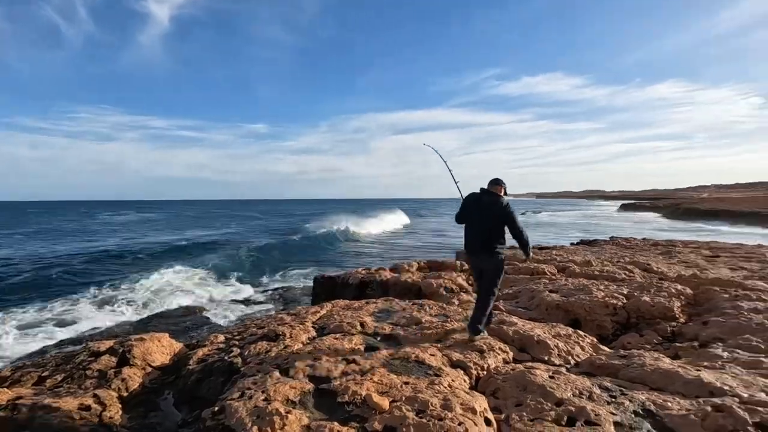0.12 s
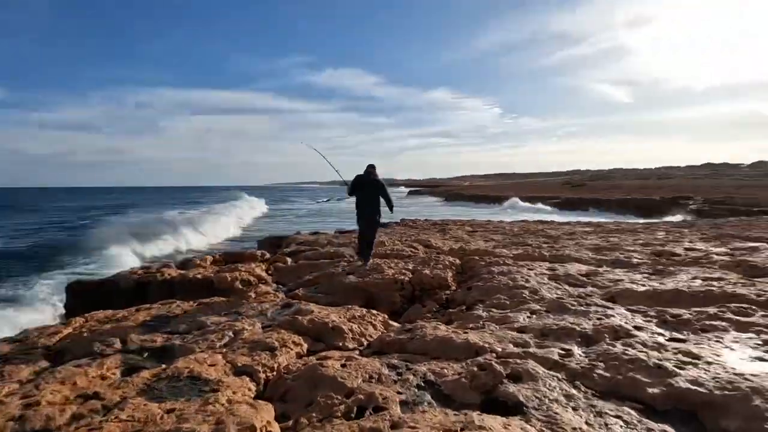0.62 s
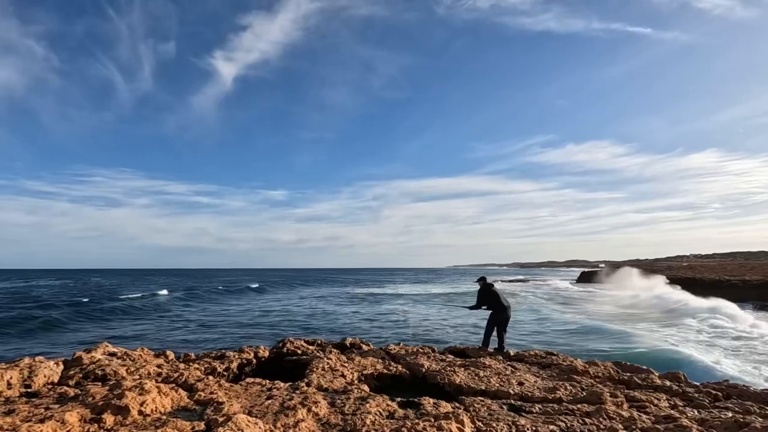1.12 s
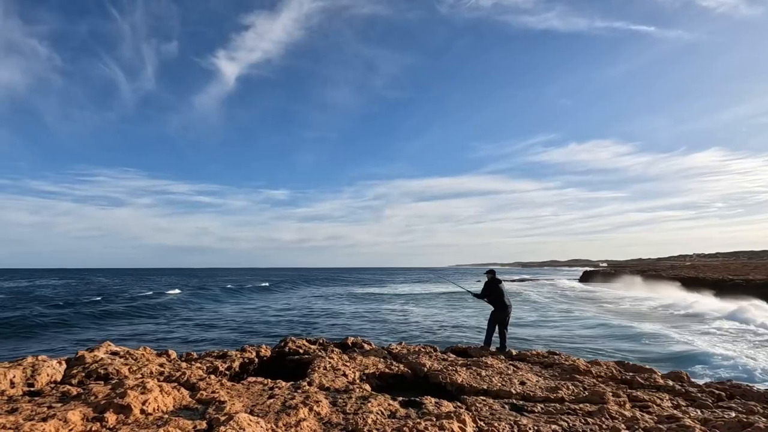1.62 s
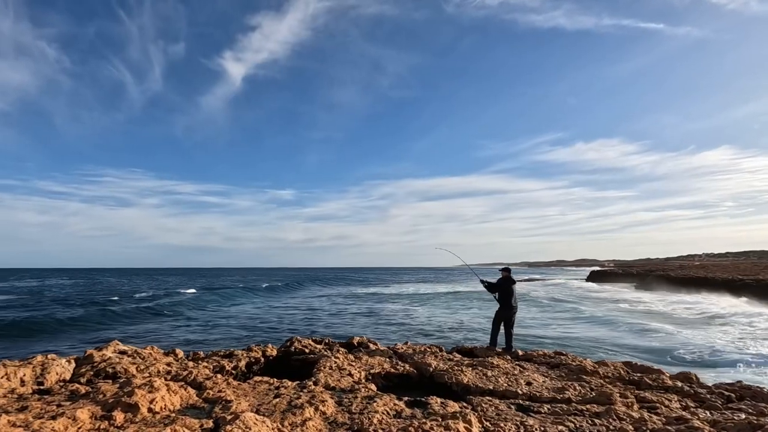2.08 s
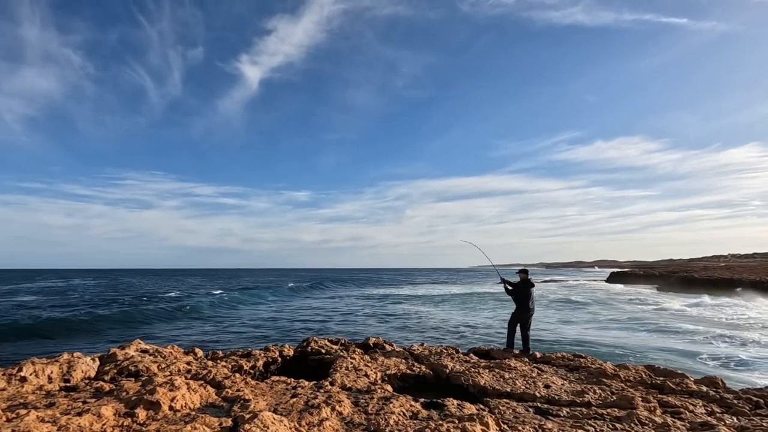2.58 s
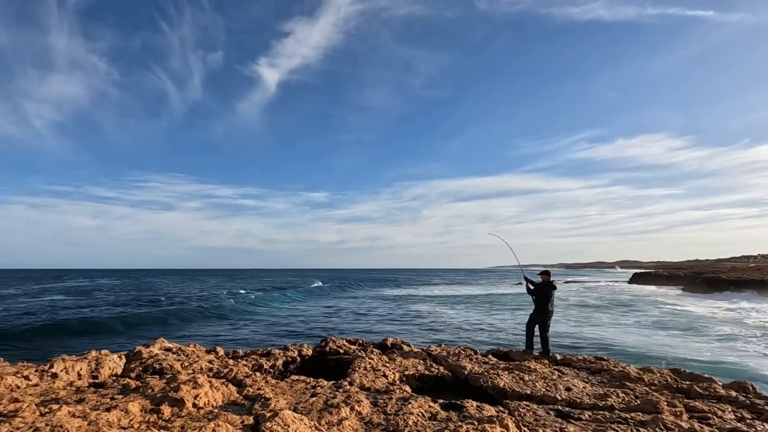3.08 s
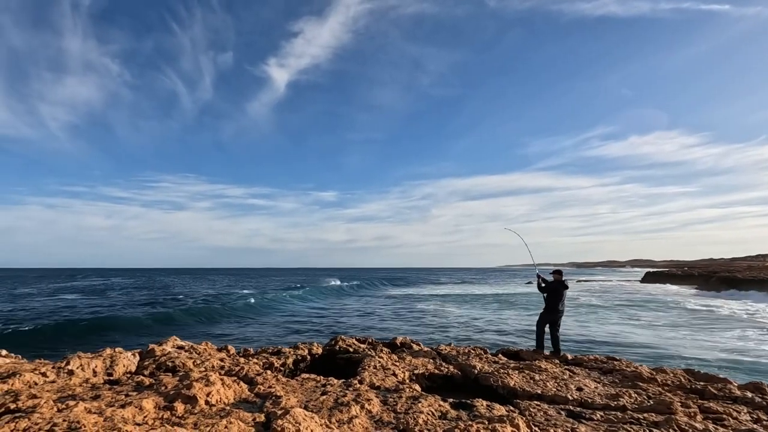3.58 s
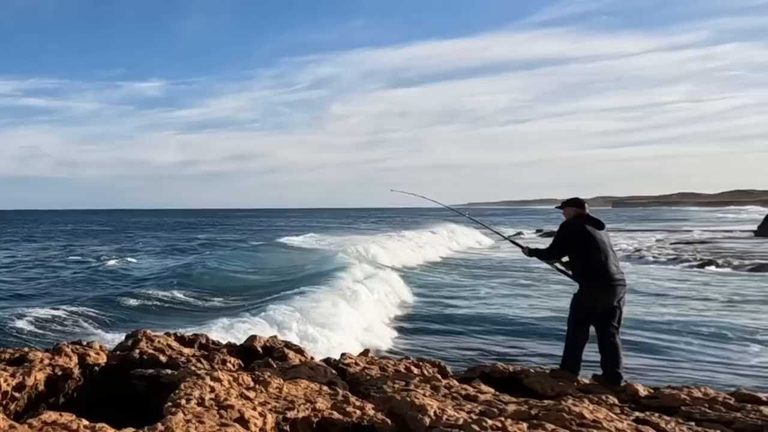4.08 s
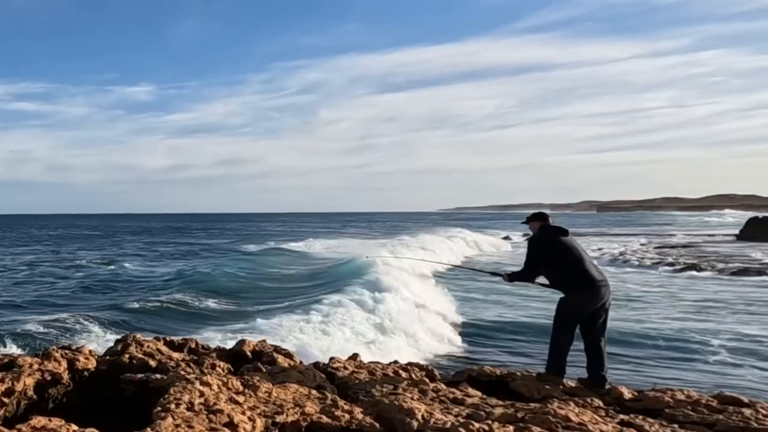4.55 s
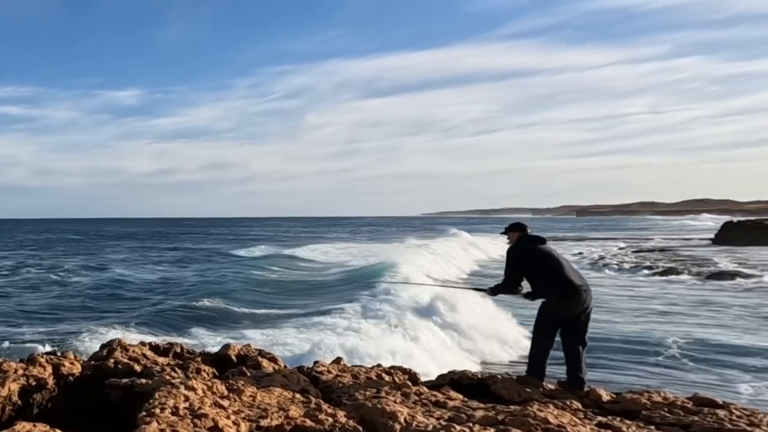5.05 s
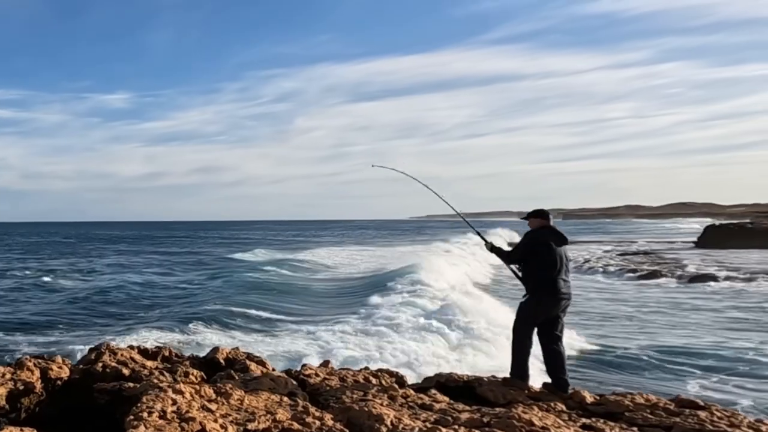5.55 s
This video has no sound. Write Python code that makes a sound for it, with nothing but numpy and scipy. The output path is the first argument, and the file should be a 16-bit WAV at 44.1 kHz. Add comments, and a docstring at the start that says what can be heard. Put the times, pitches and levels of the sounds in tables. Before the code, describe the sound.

Waves roar and foam hisses dully against a rocky shore, cut twice to a new spot, with one small water slap after the second cut.

```python
"""Surf heard from three spots on a rocky shore, one after the other, by a muffled microphone in the wind.
From the start a lumpy low roar of wind and breakers, slowly wandering noise, lies under the wash of foam,
noise whose bands rise and fall with the waves. Late at the first spot short bright hisses pass.
The surf drops out for an instant at each change of spot; at the second a new breaker recolours the foam.
Soon after the move to the third spot water slaps on rock, a few cycles of a decaying-edged tone."""
import sys
import numpy as np
from scipy import signal
from scipy.io import wavfile
from scipy.ndimage import uniform_filter1d

SR = 44100
rng = np.random.default_rng(int(sys.argv[2]) if len(sys.argv) > 2 else 0)


def rack_gain(trim_db):
    """Turn a fader trim in dB into the linear factor to multiply a signal by."""
    fader = np.asarray(trim_db, float)
    return 10 ** (fader / 20)


def output_pcm(signal):
    """Save a mono or channel-first signal as 16-bit PCM at the path in sys.argv[1].

    Samples are clipped to [-1, 1] before scaling.
    """
    pcm = np.clip(np.atleast_2d(signal).T, -1, 1) * 32767
    wavfile.write(sys.argv[1], SR, np.round(pcm).astype(np.int16))


N = 250050  # samples

# course of the surf, one table a spot: (time [s], wash of foam [dB], lift of the treble [dB],
# low roar [dB], lift of the narrow band at the foam's upper edge [dB], lift of the low middle [dB])
SURF_COURSES = [
    [(0.0, -39, 0.5, -29, 1, 1), (0.26, -37, -1.5, -30, 0, -0.5), (0.34, -36, 0, -25, 0, 1.5),
     (0.44, -38.5, 0, -25.5, 1, 0.5), (0.55, -38.5, -1.5, -26, 1, 1), (0.75, -40, 0.5, -28, 0, -2.5)],
    [(0.76, -37.5, -0.5, -27, 4, 0), (0.86, -38, 1, -22.5, 1, 4), (1.02, -37.5, -0.2, -24, 3, 3),
     (1.2, -37.5, 1.5, -25.5, 1.5, 0.5), (1.4, -36, -0.2, -25, 2, 1.5), (1.55, -36, 0, -24.5, 0, 1),
     (1.8, -38.5, 0, -26, -1.5, 0), (2.1, -37.5, -0.5, -25.5, 0.5, 0.5), (2.3, -38.5, -1.5, -28.5, 1, 0.5),
     (2.45, -37.5, -1, -26.5, 0.5, 1), (2.54, -36.5, -0.7, -27.5, 0.5, 2),
     (2.59, -32, -1.5, -21.5, -1.5, 0.5), (2.8, -32, -1, -21.5, 2.5, 3), (3.0, -32, -0.5, -22.5, 0, 0.5),
     (3.2, -33.5, 1, -25.5, -2, -2.5), (3.55, -34.5, -0.5, -24, -1.5, 1.5), (3.8, -36, 2, -24.5, -2.5, 0),
     (4.1, -36.5, 2.5, -27.5, -5, 1)],
    [(4.12, -31.5, 2, -22.5, -1, 2.5), (4.22, -31, 1, -21, 1, -1.5), (4.33, -32, 0.5, -21, 0.5, -2.5),
     (4.405, -31.5, 1.5, -20, -2, -1), (4.425, -28, -2, -19.5, 0, -2.5), (4.47, -29, -3, -21.5, 0, -1),
     (4.7, -31, -1, -21.5, 1, -1), (4.9, -31, 0, -22.5, 1.5, -1.5), (5.12, -31.5, 3, -21.5, 0, 4),
     (5.25, -32, 0.5, -21, 0.5, 3), (5.38, -32.5, -2, -24, -0.5, 6.5),
     (5.55, -32.5, 0.5, -21.5, -0.5, -0.5), (5.67, -34, -0.8, -24, 0, -2)],
]
# colour of the foam, one table a spot: (frequency [Hz], density [dB per Hz])
FOAM_COLOURS = [
    [(300, -22.5), (450, -3), (600, 0), (850, -1), (1200, -7), (1600, -15), (2300, -17.5), (3000, -20.5),
     (3600, -26), (4300, -27), (5200, -27.5), (5800, -33.5), (7000, -44), (8000, -51.5), (9500, -65),
     (11500, -74.5)],
    [(300, -22), (450, -1.5), (850, -1.5), (1200, -4.5), (1600, -7.5), (2300, -12.5), (2700, -16.5),
     (3100, -19.5), (3450, -19), (3850, -21), (4200, -26.5), (4600, -31.5), (5500, -34), (6300, -38.5),
     (7200, -41), (8000, -51), (9500, -62), (11500, -76.5)],
    [(300, -26), (450, -2), (850, 1), (1200, -2.5), (1600, -4.5), (1900, -8.5), (2200, -13.5), (3300, -16),
     (3800, -18.5), (4500, -25.5), (5500, -34.5), (7000, -40), (8000, -47), (9500, -59), (11500, -79)],
]
# colour of the distant low roar: (frequency [Hz], density [dB per Hz])
ROAR_COLOUR = [(10, -62), (22, -42), (50, -20), (100, -10), (165, -2.5), (260, -0.5), (370, -5.5),
               (560, -19.5), (730, -42), (1200, -100)]
# extra rumble below the roar's hump, one value a spot: (level [dB])
DEEP_RUMBLE = [4, 0, -0.5]
# changes of spot: (time the surf stops [s], silence [s], fade-in [s], fade-out before the stop [s])
SPOT_CHANGES = [(.7535, .0003, .002, .016), (4.1053, .0103, .015, .005)]
# how far each band of foam follows the wash: (frequency [Hz], slope [dB per dB])
WASH_FOLLOWING = [(700, 0.82), (2300, 1.28), (4000, 0.96), (7500, 0.8)]
# how much of the treble lift each band takes: (frequency [Hz], share [0-1])
TREBLE_SHARE = [(1400, 0.15), (3200, 0.95), (6300, 0.8)]
# narrow band at the foam's upper edge: (frequency [Hz], share of its lift [0-1])
UPPER_EDGE_SHARE = [(3500, 0), (4000, 0.99), (4250, 0.97), (4700, 0.06)]
# low middle of the foam: (frequency [Hz], share of its lift [0-1])
LOW_MIDDLE_SHARE = [(350, 0.99), (620, 0.95), (850, 0)]
# presence of the new breaker at the second spot: (time [s], share [0-1])
BREAKER_COURSE = [(2.2, 0), (3.3, 0.5), (4.11, 0.5), (4.112, 0)]
# what that breaker does to the foam's colour at full share: (frequency [Hz], lift [dB])
BREAKER_TINT = [(1200, 0.5), (1700, -1.5), (2300, 0.5), (2800, 1.5), (3500, -2), (4700, 2.5), (5500, 0),
                (6200, 1), (8000, -4.5)]
# bright hisses: (time of the peak [s], rms at the peak [dB], rise [s], fall [s])
HISS_EVENTS = [(.6475, -45.5, .005, .007), (.72, -69.5, .06, .03), (.743, -54.5, .0025, .005)]
# colour of the hisses: (frequency [Hz], density [dB per Hz])
HISS_COLOUR = [(1500, -20), (2600, 3), (5000, 3), (8500, -9), (12000, -12), (15200, -12), (16500, -30)]
# slaps of water on rock: (time [s], peak [dB], pitch [Hz])
SLAP_EVENTS = [(4.417, -21.5, 2500)]


def evened(x):
    """Scales to rms 1."""
    return x / np.sqrt(np.mean(x ** 2) + 1e-20)


def read(points, hz):
    """Reads a spectrum on a log-frequency axis."""
    f, value = np.transpose(points)
    return np.interp(np.log(hz + 1), np.log(f + 1), value)


def drift(shape, bins, frames):
    """Smooth random field over frequency and time, rms 1."""
    field = uniform_filter1d(rng.standard_normal(shape[::-1]).T, bins, 0)
    for _ in range(2):
        field = uniform_filter1d(field, frames, 1)
    return evened(field)


def noise(field_db, size):
    """Random short-time spectra of the given magnitude (bins x frames), frames a quarter size apart."""
    a, b = rng.standard_normal(field_db.shape[::-1] + (2,)).T
    spectra = a + 1j * b
    white = signal.istft(spectra, nperseg=size)[1]
    white_rms = np.sqrt(np.sum(white ** 2) / a.shape[1] / (size // 2))
    sound = signal.istft(spectra * rack_gain(field_db), nperseg=size, noverlap=3 * size // 4)[1]
    return sound * np.sqrt(2) / white_rms


def steady_noise(colour_db, size):
    """Noise of one unchanging colour, N samples long."""
    return noise(np.repeat(colour_db[:, None], 4 * N // size + 5, 1), size)[:N]


def levelled(db, hz, low_hz, high_hz):
    """Shifts a spectrum so that the band low-high of noise made from it has rms 1."""
    band = (hz >= low_hz) & (hz <= high_hz)
    return db - 10 * np.log10(np.sum(rack_gain(db[band]) ** 2) / len(hz))


def frame_times(size):
    """Times in seconds of noise frames a quarter size apart."""
    return np.arange(4 * N // size + 5) * size / (4 * SR)


def roar(course, deep_db):
    """Wind and breakers: a low hump of noise whose level follows the course and wanders in gusts."""
    size, gusty_db = 4096, 0.45
    hz, t = np.fft.rfftfreq(size, 1 / SR), frame_times(512)
    hump_db = read(ROAR_COLOUR, hz) + deep_db * read([(90, 0.98), (200, 0.02)], hz)
    s, _, _, roar_db, _, _ = np.transpose(course)
    gusts_db = np.interp(t, s, roar_db) + gusty_db * drift((1, len(t)), bins=1, frames=14)[0]
    return evened(steady_noise(hump_db, size)) * rack_gain(np.interp(np.arange(N) / SR, t, gusts_db))


def foam(course, colour):
    """Wash of bursting bubbles: noise whose bands each follow the wave, with patches and shared flicker."""
    size, patchy_db, splashy_db = 512, 0.5, 0.18
    hz, t = np.fft.rfftfreq(size, 1 / SR), frame_times(size)
    s, *columns = np.transpose(course)
    wash_db, lift_db, _, edge_db, middle_db = (np.interp(t, s, c) for c in columns)
    usual_db = np.mean(columns[0])
    foam_db = levelled(read(colour, hz), hz, 660, 2000)[:, None] + usual_db
    foam_db = foam_db + read(WASH_FOLLOWING, hz)[:, None] * (wash_db - usual_db)  # middle moves most
    foam_db += read(TREBLE_SHARE, hz)[:, None] * lift_db  # small bubbles come and go more than large ones
    foam_db += read(UPPER_EDGE_SHARE, hz)[:, None] * edge_db
    foam_db += read(LOW_MIDDLE_SHARE, hz)[:, None] * middle_db
    foam_db += read(BREAKER_TINT, hz)[:, None] * np.interp(t, *np.transpose(BREAKER_COURSE))
    foam_db += patchy_db * drift(foam_db.shape, bins=8, frames=8)  # patches of bursting bubbles
    foam_db += splashy_db * drift((1, len(t)), bins=1, frames=12)  # splashes stir all bands at once
    return noise(foam_db, size)[:N]


def hisses():
    """Brief wide puffs of noise, each with an exponential rise and fall."""
    size, t = 256, np.arange(N) / SR
    hiss = steady_noise(read(HISS_COLOUR, np.fft.rfftfreq(size, 1 / SR)), size)
    shape = np.zeros(N)
    for s, db, rise, fall in HISS_EVENTS:
        shape += rack_gain(db) * np.exp(np.minimum((t - s) / rise, (s - t) / fall))
    return evened(hiss) * shape


def slaps():
    """A few cycles of a tone in a smooth swell, as a pocket of air is struck."""
    out, t = np.zeros(N), np.arange(0, 0.0013, 1 / SR)
    for s, db, hz in SLAP_EVENTS:
        slap = rack_gain(db) * np.hanning(len(t)) * np.sin(2 * np.pi * hz * t)
        out[round(s * SR):][:len(t)] += slap
    return out


def presence(start, stop):
    """Gain of one spot: in after the change that starts it, out into the change that stops it."""
    t = np.arange(N) / SR
    since = t - start[0] - start[1]
    left = stop[0] - t
    # the steep second factors open and shut the sound within a fraction of a millisecond
    fade_in = np.clip(.25 + .75 * (since / start[2]) ** 2, 0, 1) * np.clip(since / .0002, 0, 1)
    fade_out = np.clip(.3 + .7 * left / stop[3], 0, 1) * np.clip(left / .0003, 0, 1)
    return fade_in * fade_out


def scene():
    """The surf at the three spots in turn, with the hisses and slaps over it."""
    out = hisses() + slaps()
    starts = [(-1.2, 0, 1, 1)] + SPOT_CHANGES  # first spot is already fully in
    stops = SPOT_CHANGES + [(1 + N / SR, 0, 1, 1)]  # last spot never fades out
    for course, colour, deep_db, start, stop in zip(SURF_COURSES, FOAM_COLOURS, DEEP_RUMBLE, starts, stops):
        out += (roar(course, deep_db) + foam(course, colour)) * presence(start, stop)
    return out[None]


def band_limit(x):
    """A steep low-pass at the top of the band."""
    return signal.sosfilt(signal.butter(12, 15800, fs=SR, output="sos"), x)


def record(dry):
    """At the microphone a quick limiter eases the peaks of the roar and faint electronic hiss joins."""
    ceiling = 0.35  # low-band rms at which the gain has eased by 3 dB
    floor_db = -115  # rms of the electronic hiss
    dull = signal.sosfiltfilt(signal.butter(2, 500, fs=SR, output="sos"), dry)
    roar_power = uniform_filter1d(dull ** 2, 200)
    rounded = dry / np.sqrt(1 + roar_power / ceiling ** 2)
    hissed = rounded + rack_gain(floor_db) * rng.standard_normal(dry.shape)
    return band_limit(hissed)


dry = scene()
out = record(dry)
output_pcm(out)
```